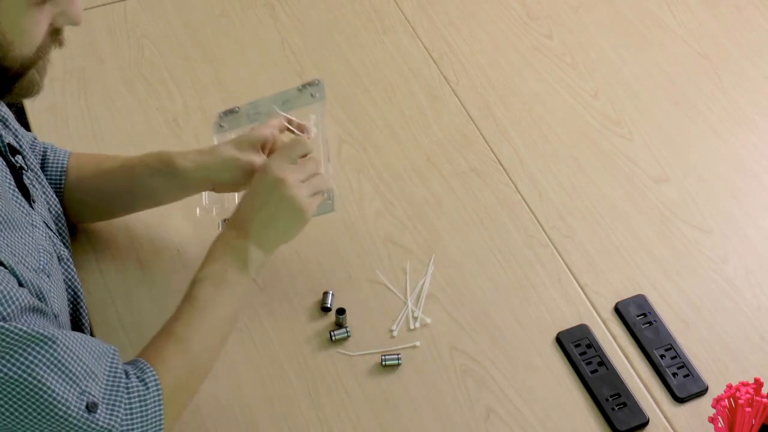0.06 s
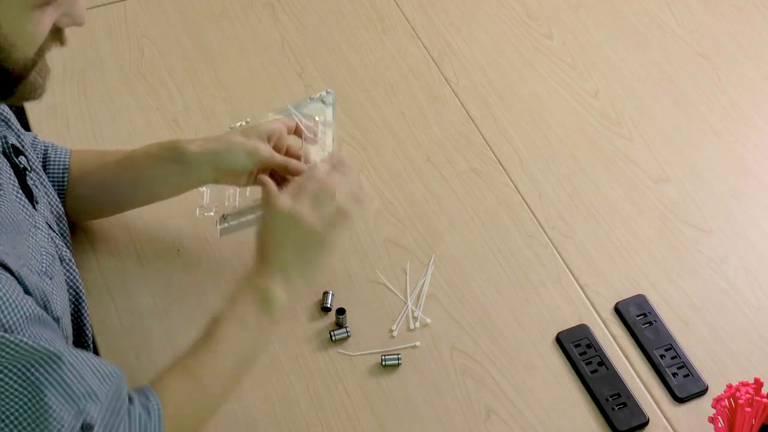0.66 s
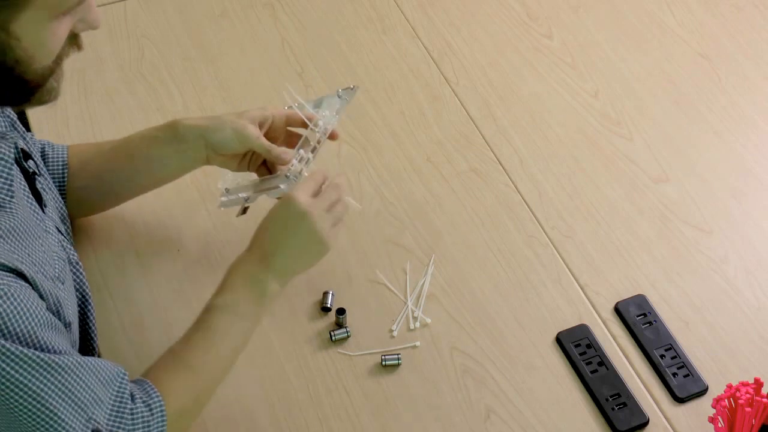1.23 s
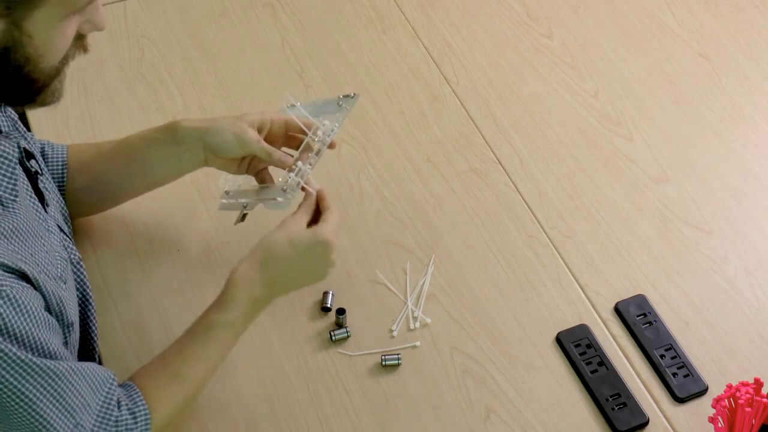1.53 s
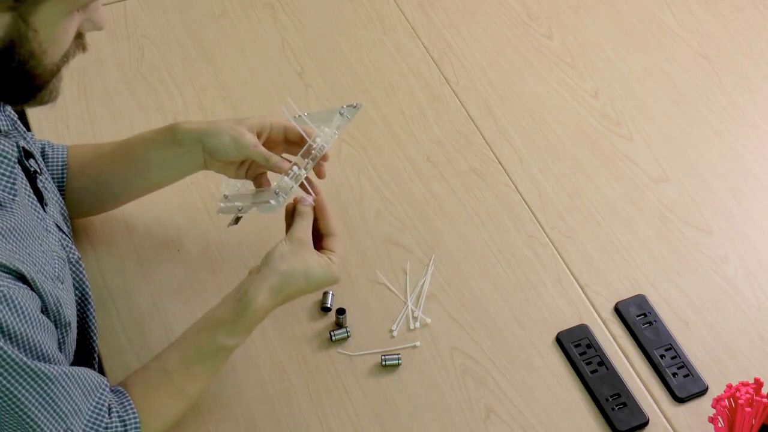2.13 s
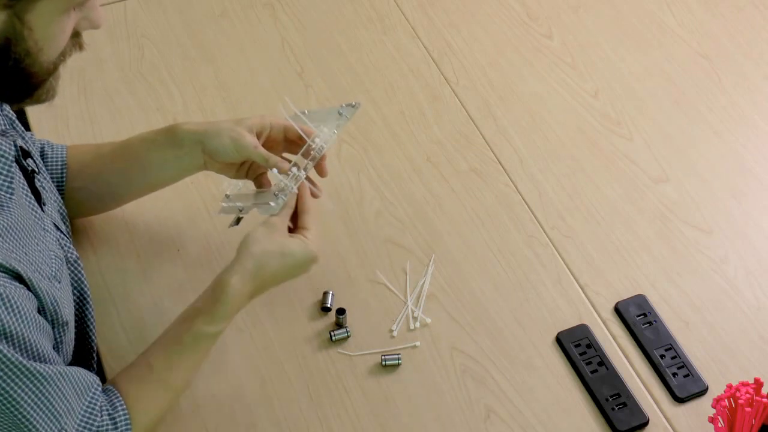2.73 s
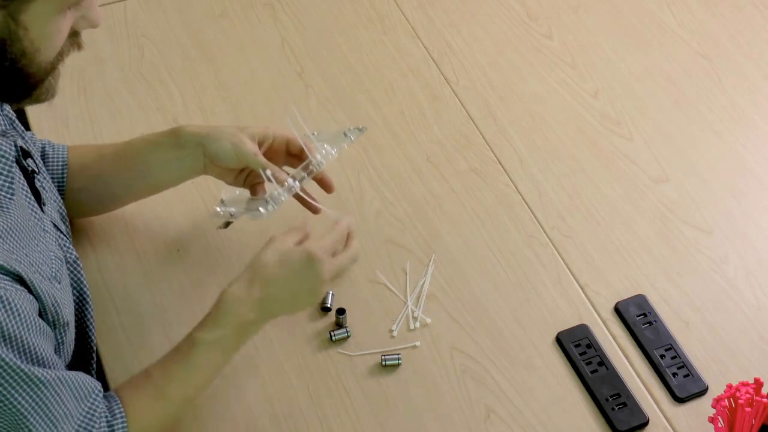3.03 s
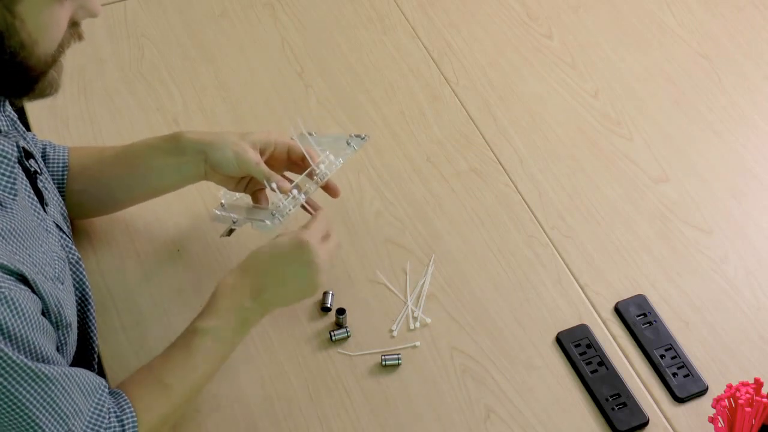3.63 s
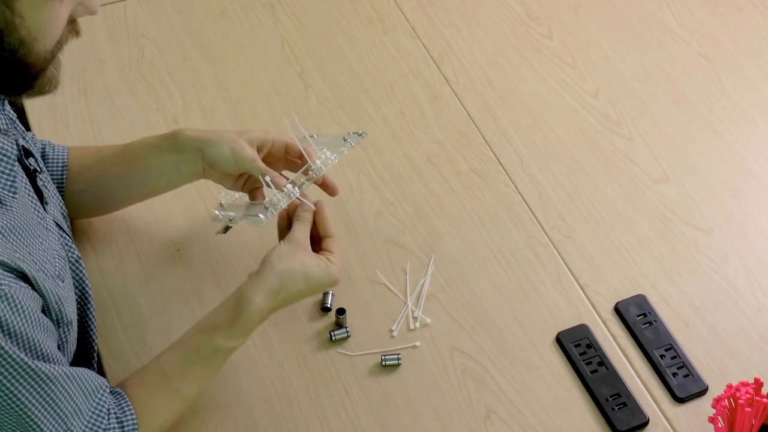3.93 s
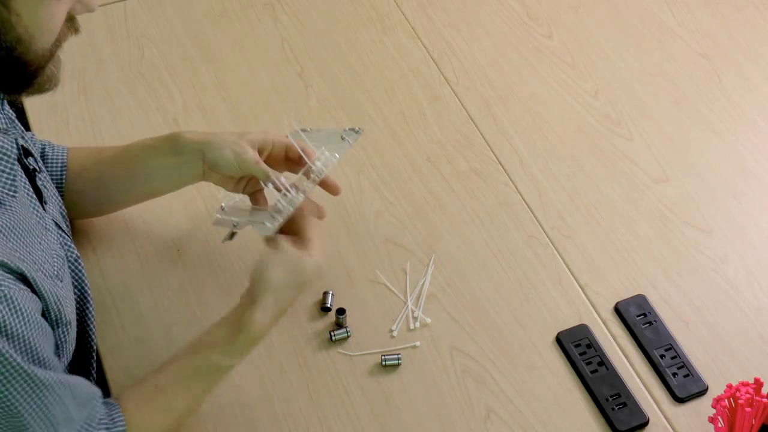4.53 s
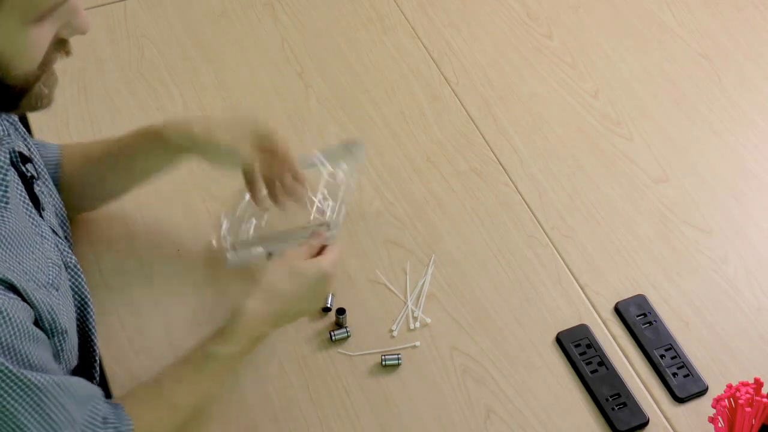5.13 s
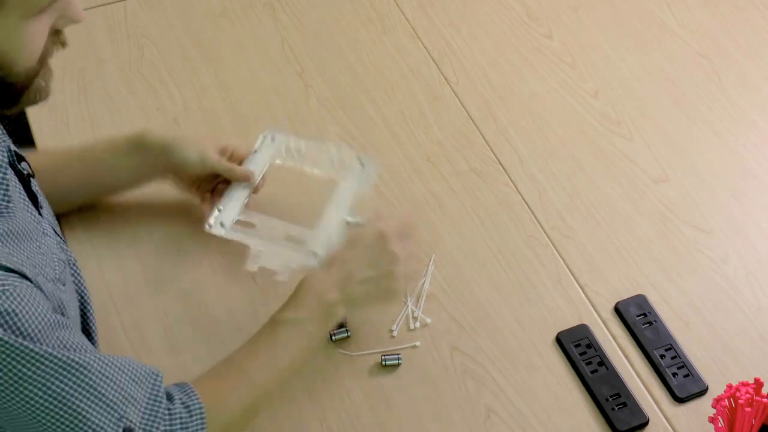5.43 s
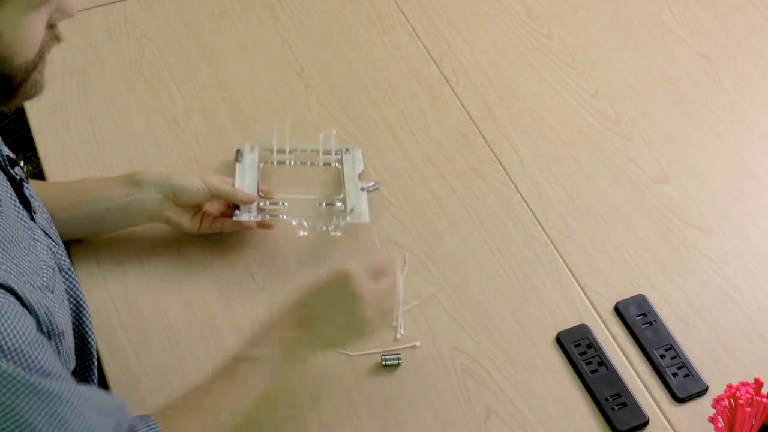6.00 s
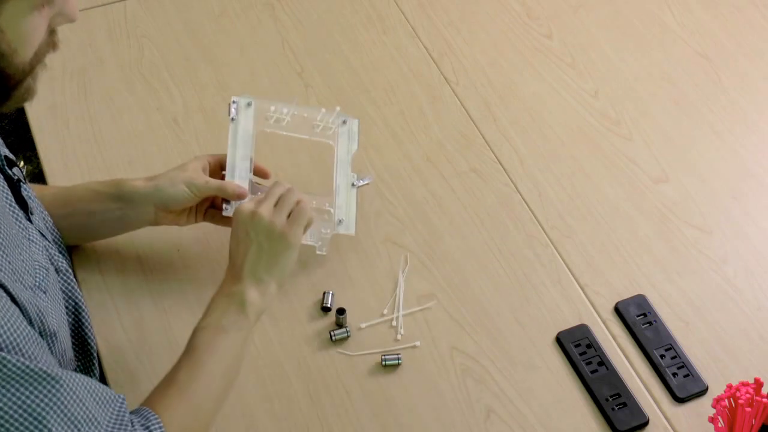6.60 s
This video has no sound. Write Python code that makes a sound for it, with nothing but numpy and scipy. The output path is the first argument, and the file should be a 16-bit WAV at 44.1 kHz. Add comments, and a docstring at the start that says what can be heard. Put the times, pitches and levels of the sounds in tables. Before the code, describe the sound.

In a quiet room with steadily rumbling air and a very faint fan whine, small plastic ties click and scrape nearby as they slide through holes in a plate. After a brief, crisp zip, the plastic plate clatters onto a wooden tabletop, bounces and knocks down on another edge. Fingers then stir the loose ties on the wood with a light, dry rattle.

```python
"""In a quiet ventilated room, nylon zip ties are threaded through a plastic plate over a wooden table.
The ties tick as they catch in the holes and snap free, and rasp as they slide. The plate is put down
with a short rattle and tipped onto another edge; each blow rings the plate and thumps the table.
A hand rummages among the loose ties on the wood. Behind it all, air rumbles and a fan whines faintly."""
import sys
import numpy as np
from scipy import signal
from scipy.fft import rfft, irfft
from scipy.io import wavfile

SR = 44100
rng = np.random.default_rng(int(sys.argv[2]) if len(sys.argv) > 2 else 0)


def generate_wav(sig):
    """Save sig (samples, or channels by samples) to the path in sys.argv[1] as 16-bit PCM at SR."""
    pcm = np.round(np.clip(np.atleast_2d(sig).T, -1, 1) * 32767).astype(np.int16)
    wavfile.write(sys.argv[1], SR, pcm)


N = 298116

# The plate's crack: many crowded tones that die quickly. Each row: frequency in Hz, level in dB.
PLATE_CRACK = [(150, -19), (680, 14.5), (1020, 3), (1700, 6.5), (3000, 1), (4000, 1), (4700, -11),
               (6000, -2), (8500, 1.5), (11000, -1.5), (14500, 1), (16000, -10)]


def ticks(fade_s=0.013, rise_s=0.000063):
    """A tie catches on the edge of a hole and snaps free, once or tooth after tooth."""
    # Each row: start in seconds, energy in dB, brightness in dB per octave.
    snaps = [(0.0629, -37.5, -2), (.096, -39.5, 0), (0.4923, -32.5, 34), (.641, -44, -3), (.656, -44, 1),
             (1.0984, -39.5, -0.5), (1.315, -40.5, 0), (1.325, -44, 1), (2.0466, -30, 18),
             (2.7803, -39.5, 4.5), (2.821, -24.5, 6.5), (3.046, -35.5, 4), (3.2894, -35, 4),
             (3.3555, -40.5, 2), (3.433, -42, -2), (3.607, -39.5, -3), (3.722, -43, 7), (4.0497, -32, 13.5),
             (4.2984, -34, 11), (4.7628, -31, 7)]
    # A tie's free end sounds lower as more comes through the hole. Each row: time in seconds, pitch in Hz.
    free_end = [(.06, 2030), (1.1, 2830), (1.32, 2420), (2.05, 2370), (2.8, 1490), (3.05, 2680),
                (3.6, 2600), (4.05, 1780), (4.76, 1420)]
    out = np.zeros(N)
    for s, db, tilt_db in snaps + teeth():
        pitch_hz = np.interp(s, *np.transpose(free_end))
        add(out, s, amp(db) * tie(burst(fade_s, rise_s), pitch_hz, tilt_db))
    return out


def teeth(step_db=-2):
    """Lists the snaps of teeth slipping over an edge, evenly spaced, each lighter than the last."""
    # Each row: start and end in seconds, first tooth in dB, gap in seconds, brightness in dB per octave.
    zips = [(2.061, 2.068, -36, 0.0044, 1.5), (3.2395, 3.254, -30, 0.0093, -2),
            (3.2658, 3.284, -36, 0.0091, -1), (4.7531, 4.756, -17, 0.0033, 0.5)]
    return [(s, db + k * step_db, tilt_db)
            for start, end, db, gap_s, tilt_db in zips
            for k, s in enumerate(np.arange(start, end, gap_s))]


def scrapes():
    """Nylon rasps as it slides in a hole or along the plate."""
    # Each row: start and end in seconds, level in dB, pitch in Hz, brightness in dB per octave.
    slides = [(0.052, 0.105, -71.5, 1950, -1), (0.52, 0.538, -67, 1300, -11), (1.25, 1.279, -70, 2010, -3),
              (1.81, 1.826, -77, 2600, 25), (2.896, 2.907, -67.5, 2300, -8.5),
              (2.94, 3.003, -71, 2440, -2.5), (3.084, 3.098, -70, 1400, 1), (3.206, 3.231, -64, 2150, 7),
              (4.428, 4.469, -65.5, 2240, 0), (5.194, 5.246, -55.5, 2040, -6.5),
              (5.205, 5.252, -57, 2860, -10)]
    out = np.zeros(N)
    for start, end, db, pitch_hz, tilt_db in slides:
        rasp = stroke(end - start)
        add(out, start, amp(db) * np.sqrt(len(rasp)) * tie(rasp, pitch_hz, tilt_db))
    return out


def tie(x, pitch_hz, tilt_db, bend_octaves=0.21):
    """Gives x the tone of a tie: its free length sets the pitch, and a sharper slip is brighter."""
    # The nylon's own tone. Each row: frequency in Hz, level in dB.
    nylon = [(200, -48), (900, -5), (1800, 4.5), (3000, -3.5), (4200, 0.5), (6400, -3.5), (8500, -1.5),
             (10500, -4), (13000, -3), (16000, -6.5)]
    # A strip held at one end rings at tones spaced like odd numbers squared.
    # Each row: odd number, boost in dB.
    bending = [(3, 10), (5, 7), (7, 1), (9, -5.5)]
    # Narrower rings. Each row: multiple of the pitch, width in octaves, full boost in dB.
    narrow_rings = [(1.63, .04, 5), (2.58, .035, 6), (2.98, .028, 10), (3.42, .025, 9), (4.77, .03, 7)]
    # A short, stiff end rings more clearly than a limp one. Each row: pitch in Hz, share of that boost.
    stiffness = [(1500, .1), (2400, 1)]

    def db_of(hz):
        bends = sum(db * hump(hz, pitch_hz * (odd / 3) ** 2, bend_octaves) for odd, db in bending)
        rings = sum(db * hump(hz, pitch_hz * ratio, width) for ratio, width, db in narrow_rings)
        brightness = tilt_db * np.log2(np.clip(hz, 1500, 12000))
        return read(nylon, hz) + bends + rings * read(stiffness, pitch_hz) + brightness
    return unit(colour(x, db_of))


def head_clack(start_s=4.7533, db=-24, hard_hz=1394):
    """The last zip ends as the tie's head hits the plate; the hand keeps the clack dull and short."""
    out = np.zeros(N)
    clack = colour(burst(fade_s=0.016, rise_s=0.00011), lambda hz: read(PLATE_CRACK, hz))
    add(out, start_s, amp(db) * unit(soften(clack, hard_hz)))
    return out


def knocks(plate_db=-4, thud_db=-21, thud_hz=600, finger_hz=90):
    """Each blow rings the plate and pushes the table top; fingers add soft, low bumps."""
    # The table top's tones. Each row: frequency in Hz, level in dB, fade time in seconds.
    wood = [(62, -9.5, 0.21), (107, 1, 0.074), (112, -17, 0.75), (171, -5, 0.049), (231.4, -17, 0.12),
            (274, -17.5, 0.043), (475, -21.5, 0.12)]
    # Fingers bump the held plate. Each row: start in seconds, strength in dB.
    bumps = [(4.754, -36.5), (5.667, -39.5)]
    out = np.zeros(N)
    for s, force_db, hard_hz, spot in blows():
        add(out, s, amp(plate_db + force_db) * struck_plate(hard_hz, spot))
        thud = ring(wood, spot_boost(spot, np.transpose(wood)[0]))
        add(out, s, amp(thud_db + force_db) * soften(thud, thud_hz))
    for s, db in bumps:
        add(out, s, amp(db) * soften(ring(wood), finger_hz))
    return out


def blows(heavy_db=-9, chatter_gap_s=.0069, chatter_step_db=-13.5):
    """Lists every contact of plate and table: the knocks, their chatter and the settling bounces."""
    # Each row: start in seconds, force in dB, hardness as a treble cutoff in Hz,
    # spot from 0 (corner) to 1 (long edge).
    hits = [(5.0457, -3, 8800, 0.036), (5.0592, -13, 14000, 0.36), (5.112, -7.5, 11900, 0.056),
            (5.5956, -6, 3180, 1), (5.6355, -21.5, 3500, 0.27), (5.753, -16.5, 1850, 0.66),
            (5.796, -21.5, 2600, 0.67), (5.823, -23.5, 4000, 0.71), (5.8404, -23.5, 4500, 0.4),
            (5.926, -25.5, 2800, 1), (5.9547, -26.5, 1190, 1)]
    for s, force_db, hard_hz, spot in hits:
        yield s, force_db, hard_hz, spot
        if force_db > heavy_db:  # the plate touches twice more, each time more lightly
            for k in (1, 2):
                yield s + k * chatter_gap_s, force_db + k * chatter_step_db, hard_hz, spot
    # The plate settles on its corner in ever quicker, lighter and softer bounces.
    s, force_db, hard_hz, spot = 5.1414, -12, 4000, 0.17
    gap_s, shrink, step_db = .0215, .74, -4.5
    for k in range(4):
        yield s, force_db + k * step_db, hard_hz * shrink ** (k / 2), spot
        s += gap_s * shrink ** k


def struck_plate(hard_hz, spot, tones_db=-2, scatter_db=1, crack_db=0.5):
    """One blow: a crack that dies quickly and leaves the plate's hollow tones ringing."""
    # Each row: frequency in Hz, level in dB, fade time in seconds.
    tones = [(334, -37, 0.69), (385, -25, 0.22), (459, -35, 0.1), (594, -20.5, 0.039), (621, -25, 0.066),
             (720, -25, 0.06), (784, -40, 0.16), (895, -38, 0.077), (1086, -33, 0.048), (1234, -30, 0.11),
             (1433, -27.5, 0.053), (1586, -32, 0.046), (1791, -29, 0.071), (1953, -31.5, 0.061),
             (2240, -49, 0.1), (2645, -25.5, 0.04), (3870, -37, 0.035)]
    scatter = scatter_db * rng.standard_normal(len(tones))
    plate = ring(tones, tones_db + spot_boost(spot, np.transpose(tones)[0]) + scatter)
    crack = burst(fade_s=.02, rise_s=2 / hard_hz)  # a softer contact takes longer to settle
    crack = colour(crack, lambda hz: read(PLATE_CRACK, hz) + spot_boost(spot, hz))
    add(plate, 0, amp(crack_db) * unit(crack))
    return soften(plate, hard_hz)


def spot_boost(spot, hz):
    """Where the plate is hit makes some tones louder and others quieter, in dB."""
    # A blow on the long edge compared with one on a corner. Each row: frequency in Hz, change in dB.
    long_edge = [(120, -2.5), (190, 3.5), (260, 22), (330, 7), (385, -16.5), (480, 17), (680, -41),
                 (800, 14.5), (960, -25), (1400, -3), (1750, 5), (2250, -26), (3300, 1), (9000, 1.5)]
    return np.clip(spot, 0, 1) * read(long_edge, hz)


def rummage(rise_s=0.0016):
    """Limp ties land on the table in small splashes of contacts, and rattle along in between."""
    # Each row: start in seconds, energy in dB, fade time in seconds.
    landings = [(5.334, -32, 0.18), (5.4251, -33, 0.022), (5.465, -26.5, 0.0067), (5.6085, -27, .012),
                (5.6535, -26, 0.022), (5.664, -22, 0.024), (5.675, -24.5, 0.018), (5.6835, -30, 0.018),
                (5.6905, -39, 0.012), (5.7, -34, 0.029), (5.84, -29, 0.024), (5.85, -23.5, 0.03),
                (5.8858, -29, 0.011), (5.9326, -18.5, 0.019)]
    # Fingers rub the ties or sweep them over the table. Each row: start and end in seconds, level in dB.
    sweeps = [(0.377, 0.802, -77.5), (5.426, 5.599, -66), (5.626, 5.713, -57.5), (5.702, 5.755, -69),
              (5.814, 5.956, -68), (5.972, 6.173, -74.5)]
    out = np.zeros(N)
    for s, db, fade_s in landings:
        add(out, s, amp(db) * heap(burst(fade_s, rise_s)))
    for start, end, db in sweeps:
        add(out, start, amp(db) * rattle(end - start))
    return out


def rattle(seconds, touches_per_s=110, spread_db=9, rub_db=-5):
    """Separate little touches, each ringing a different tie, over a faint rub."""
    rub = heap(stroke(seconds))
    touches = np.zeros(len(rub))
    for when, size in rng.random((int(seconds * touches_per_s) + 1, 2)):
        touch = heap(burst(fade_s=0.0054, rise_s=0.00012))
        add(touches, when * seconds, amp(spread_db * size) * touch)
    return np.sqrt(seconds * SR) * unit(unit(touches) + amp(rub_db) * rub)


def heap(x, own_count=7, own_octaves=.022, own_db=10):
    """Gives x the tone of loose ties on wood; the tie that is touched adds random rings of its own."""
    # Each row: frequency in Hz, level in dB.
    broad_tone = [(280, 10.5), (900, 0), (1720, 4.5), (2150, 2.5), (3050, 4.5), (4200, 0), (4900, -2.5),
                  (8700, -3), (10500, -8), (12500, -8.5), (16000, -5)]
    # Rings stirred by chance amounts. Each row: frequency in Hz, width in octaves, boost in dB.
    shared_rings = [(1767, 0.027, 13), (3000, 0.031, 8.5), (3930, 0.028, 8), (8770, 0.035, 7)]
    rings = [(hz, octaves, db * rng.uniform(.4, 1.2)) for hz, octaves, db in shared_rings]
    rings += [(hz, own_octaves, own_db) for hz in 2200 * 6 ** rng.random(own_count)]
    peaks = lambda hz: np.max([db * hump(hz, ring_hz, octaves) for ring_hz, octaves, db in rings], 0)
    return unit(colour(x, lambda hz: read(broad_tone, hz) + peaks(hz)))


def fingers(db=-54, spread_db=5, count=40, lowest_hz=1450):
    """Faint stray ticks of the ties as the fingers shift their grip."""
    out = np.zeros(N)
    for when, size, octaves_up in rng.random((count, 3)):
        tick = tie(burst(fade_s=0.015, rise_s=0.0005), lowest_hz * 2 ** octaves_up, tilt_db=0)
        add(out, when * N / SR, amp(db + spread_db * size) * tick)
    return out


def ventilation(db=-50.0, waver_db=0.85):
    """Moving air rumbles and makes the ducts hum; its swirling swells and sinks a little."""
    # Each row: frequency in Hz, relative level in dB.
    air_tone = [(19, -32), (29, -0.5), (42, 4.5), (75, 1), (95, -7), (170, -6), (300, -13), (420, -16),
                (560, -19.5), (900, -28.5), (1900, -35), (2500, -40), (5000, -47), (8500, -47.5),
                (11000, -50.5), (16000, -50.5)]
    # Each row: frequency in Hz, width in Hz, level in dB.
    ducts = [(116, 4.2, -57), (475, 11, -72), (491.5, 3.5, -72.5)]
    hz = np.fft.rfftfreq(N, 1 / SR)
    noise = lambda gain: np.sqrt(N) * unit(irfft(rfft(rng.standard_normal(N)) * gain, N))
    air = amp(db) * noise(amp(read(air_tone, hz)))
    waver = amp(waver_db * noise(np.exp(-hz / 8)))
    air += soften(air, cutoff_hz=370) * (waver - 1)
    hum = sum(amp(hum_db) * noise(1 / (1 + ((hz - f) / width) ** 2)) for f, width, hum_db in ducts)
    return air + hum


def fan_whines(wander_hz=3, turns_per_s=6):
    """The fan's thin tones keep an even strength while their pitch wanders slightly."""
    # Each row: frequency in Hz, peak level in dB.
    tones = [(1196, -80.5), (3326, -90)]
    t = np.arange(N) / SR
    wander = lambda: wander_hz * np.interp(t * turns_per_s, np.arange(SR), rng.standard_normal(SR))
    return sum(amp(db) * np.sin(2 * np.pi * np.cumsum(hz + wander()) / SR) for hz, db in tones)


def room(x, tail_db=-15.0, bass_db=5.5, rise_s=0.0017, echo_s=0.0092, echo_db=-21):
    """The room adds one near echo and a short wash of sound that is fuller in the bass."""
    # Each row: frequency in Hz, fade time in seconds.
    fade_times = [(100, 0.6), (300, 0.58), (800, 0.61), (2000, 0.58), (6000, 0.27), (16000, 0.15)]
    hz, t, bands = signal.stft(rng.standard_normal(SR), SR, nperseg=256)
    fade = die_away(t, read(fade_times, hz)[:, None])
    bass = amp(bass_db * hump(hz, centre_hz=210, octaves=0.66))[:, None]
    tail = signal.istft(bands * fade * bass, SR, nperseg=256)[1]
    onset = np.minimum(np.arange(len(tail)) / SR / rise_s, 1)
    tail = amp(tail_db) * unit(tail * onset)
    add(tail, echo_s, amp([echo_db]))
    return x + signal.fftconvolve(x, tail)[:N]


def stroke(seconds, slips_per_s=900, spread_db=4, rub=0.13, grip_db=3, grips_per_s=200):
    """Sliding is a run of tiny uneven slips over a smooth rub, while the grip tightens and loosens."""
    n = max(round(seconds * SR), 2)
    slipping = rng.random(N) < slips_per_s / SR
    slips = slipping * amp(spread_db * np.minimum(rng.exponential(1, N), 3))
    grip = np.interp(np.arange(n) * grips_per_s / SR, np.arange(SR), rng.standard_normal(SR))
    friction = (slips + rub) * rng.standard_normal(N)
    return friction[:n] * amp(grip_db * grip) * signal.windows.tukey(n, 0.34)


def burst(fade_s, rise_s, size=2048):
    """A puff of tiny contacts that builds up quickly and dies."""
    t = np.arange(size) / SR
    shape = die_away(t, fade_s) * (1 - np.exp(-t / rise_s))
    spectrum = rfft(rng.standard_normal(size) * shape)
    evened = irfft(spectrum / (abs(spectrum) + 1e-12) ** (3 / 4))  # flattens chance peaks in the tone
    return unit(evened * shape ** (1 / 4))


def ring(tones, boost_db=0, size=16384):
    """Fading tones after a sudden push away from the listener."""
    hz, db, fade_s = np.transpose(tones)
    t = np.arange(size)[:, None] / SR
    return -(amp(db + boost_db) * die_away(t, fade_s) * np.cos(2 * np.pi * hz * t)).sum(1)


def die_away(t, fade_s):
    """A fade that falls by 60 dB in the fade time."""
    return np.exp(-np.log(1000) * t / fade_s)


def soften(x, cutoff_hz):
    """Turns down the treble, as a soft contact does."""
    return signal.lfilter(*signal.butter(1, cutoff_hz, fs=SR), x)


def colour(x, db_of, size=1024):
    """Changes each frequency by db_of(Hz) decibels, without smearing the sound ahead of its start."""
    log_gain = np.log(amp(db_of(abs(np.fft.fftfreq(size, 1 / SR)))))
    response = np.exp(np.conj(signal.hilbert(log_gain)))
    return signal.fftconvolve(x, np.fft.ifft(response).real[:size // 2])


def hump(hz, centre_hz, octaves):
    """A bell curve of height one around a frequency."""
    return np.exp(-.5 * (np.log2((hz + 1) / centre_hz) / octaves) ** 2)


def read(points, hz):
    """Reads between (Hz, value) points, with octaves evenly spaced."""
    f, value = np.transpose(points)
    return np.interp(np.log(hz + 1), np.log(f + 1), value)


def add(mix, s, sound):
    """Mixes a sound in at s seconds."""
    part = mix[round(s * SR):][:len(sound)]
    part += sound[:len(part)]


def amp(db):
    """Turns decibels into a multiplier."""
    return 10 ** (np.asarray(db) / 20)


def unit(x):
    """Scales to an energy of one."""
    return x / np.sqrt(np.sum(x ** 2) + 1e-20)


def scene():
    """The table spreads its knocks through the room; the small ties in the hands echo less."""
    on_table = room(knocks() + rummage())
    in_hands = room(ticks() + head_clack() + scrapes() + fingers(), tail_db=-21)
    return (on_table + in_hands + ventilation() + fan_whines())[None]


def record(dry, top_hz=15850):
    """Cuts off the very highest treble."""
    treble_cut = signal.firwin(511, top_hz, window=("kaiser", 8), fs=SR)
    return signal.oaconvolve(dry, treble_cut[None], "same")


dry = scene()
out = record(dry)
generate_wav(out)
```